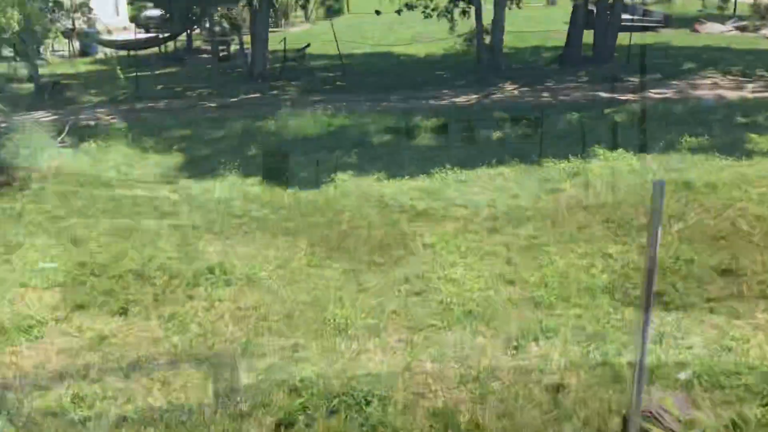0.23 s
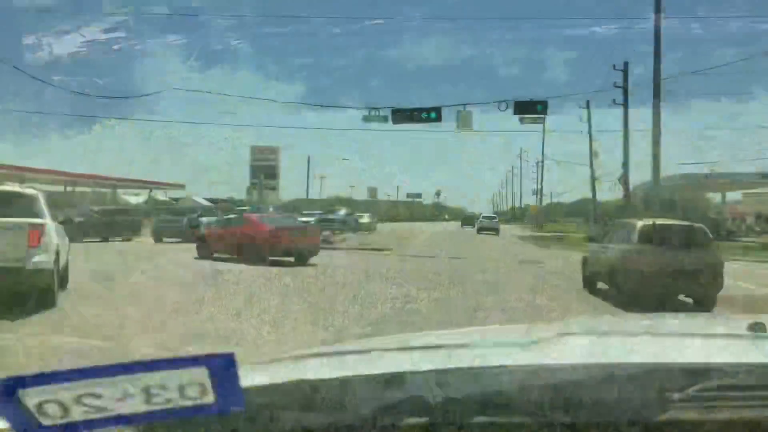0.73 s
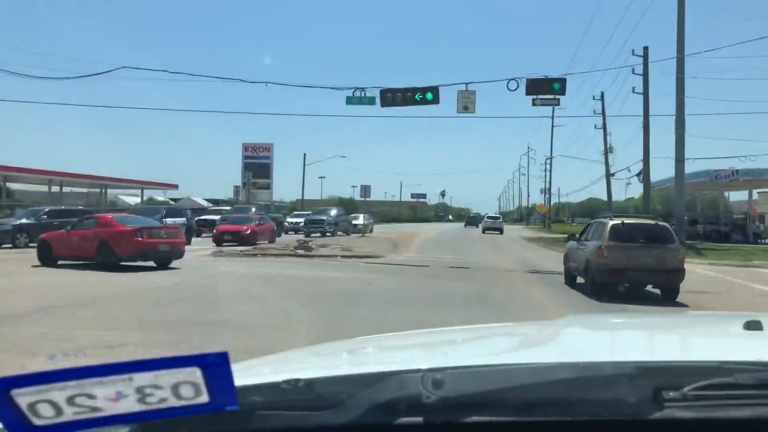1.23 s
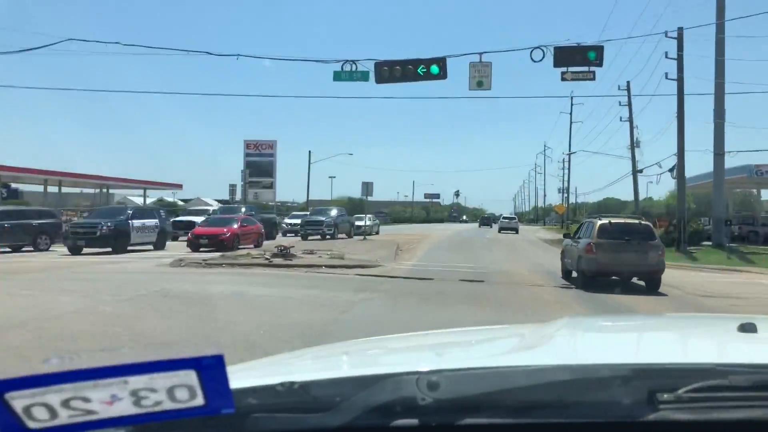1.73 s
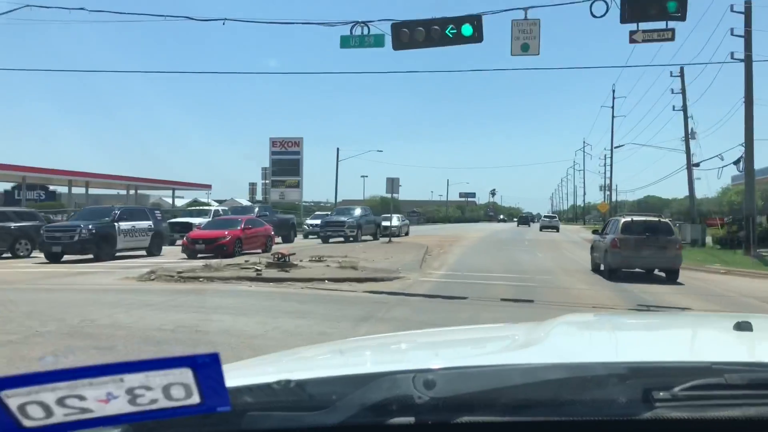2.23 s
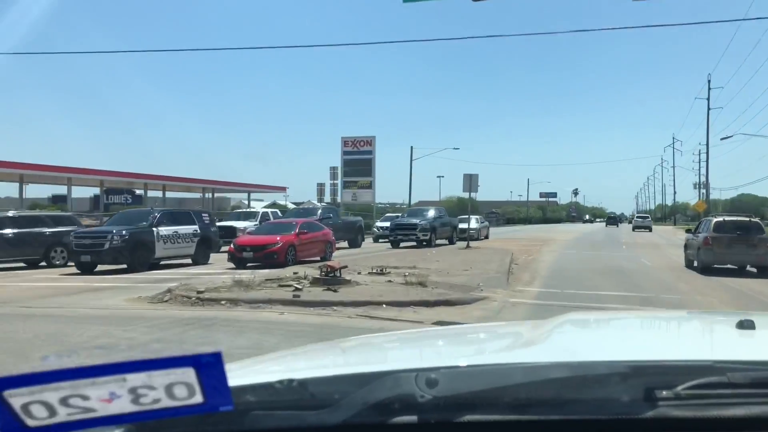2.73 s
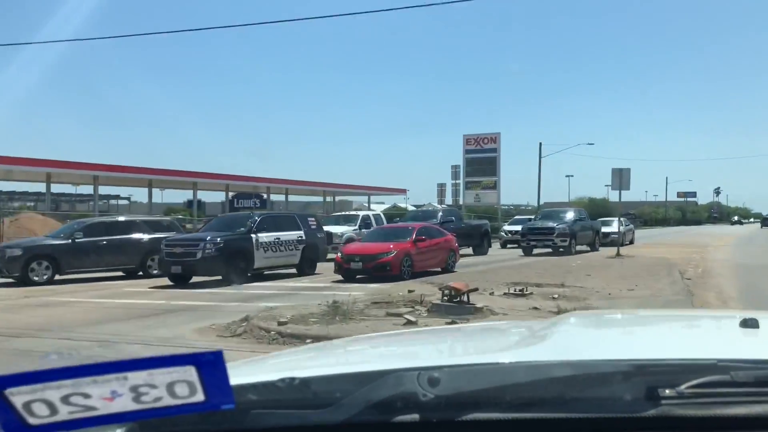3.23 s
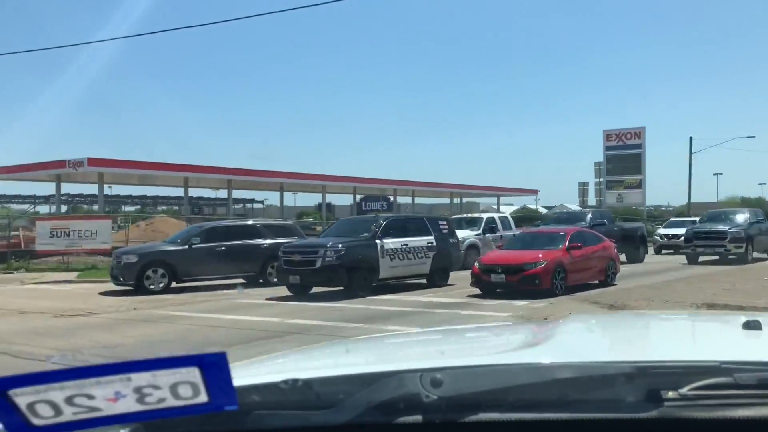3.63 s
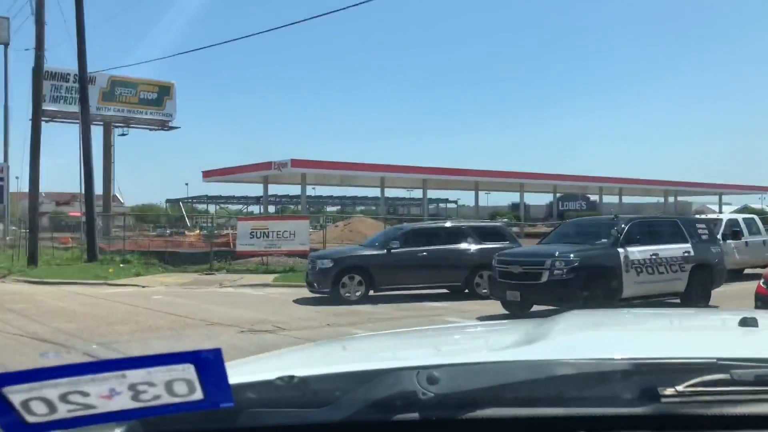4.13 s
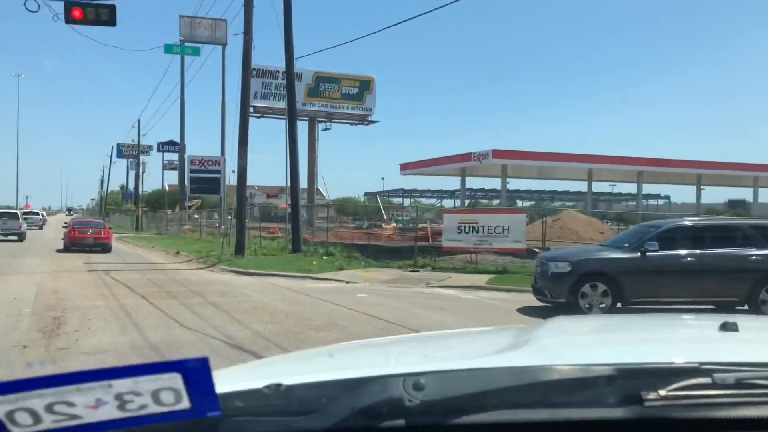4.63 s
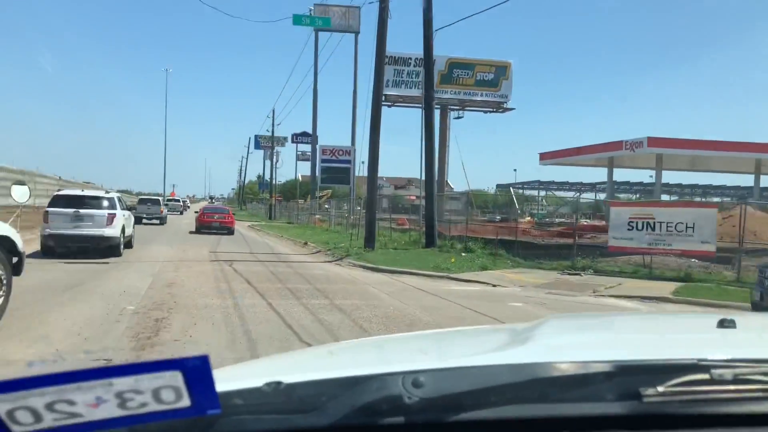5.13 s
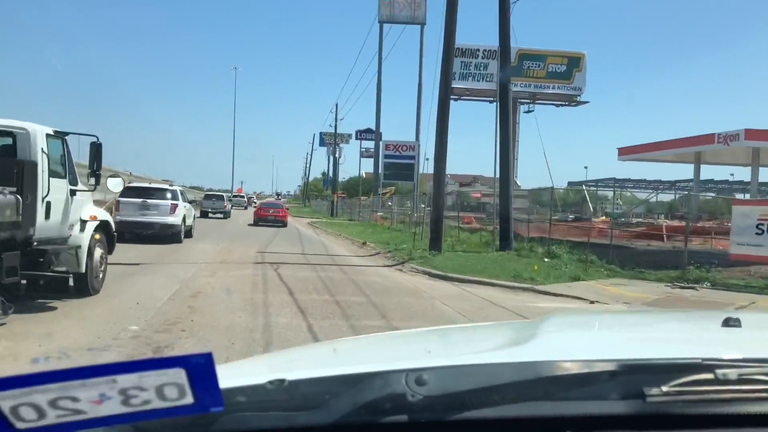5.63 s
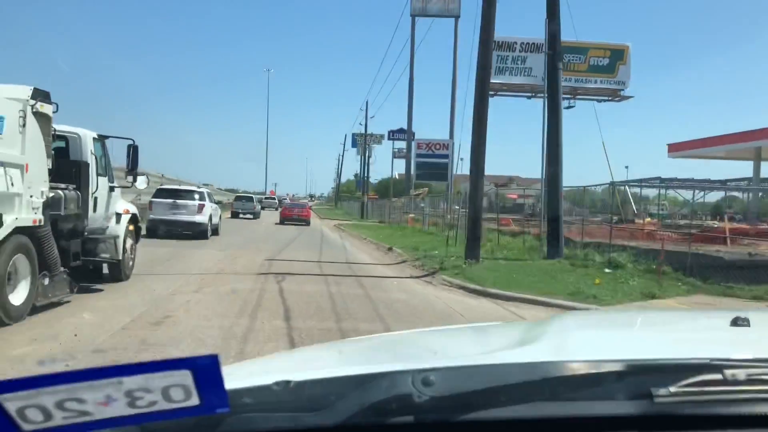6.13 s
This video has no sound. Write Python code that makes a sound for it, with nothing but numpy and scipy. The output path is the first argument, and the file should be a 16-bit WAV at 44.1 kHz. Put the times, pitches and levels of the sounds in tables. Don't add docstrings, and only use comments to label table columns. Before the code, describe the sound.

A faint outdoor garden ambience dissolves into a rumbling diesel pickup cab, indicator tick-tocking steadily, loose keys knocking as it turns and pulls away.

```python
import sys
import numpy as np
from scipy import signal
from scipy.fft import rfft, irfft, next_fast_len
from scipy.io import wavfile
from scipy.ndimage import uniform_filter1d

SR = 44100
rng = np.random.default_rng(int(sys.argv[2]) if len(sys.argv) > 2 else 0)


def transcribe(u):
    v = np.clip(np.atleast_2d(u).T, -1, 1)
    q = np.round(v * 32767).astype(np.int16)
    wavfile.write(sys.argv[1], SR, q)


def undo_db(level):
    steps = np.asarray(level, float) / 20
    return 10 ** steps


N = 281534


def rms_one(x):
    return x / np.sqrt(np.mean(x ** 2) + 1e-20)


def in_time(rows):
    s, *columns = np.transpose(rows)
    return [np.interp(np.arange(N) / SR, s, c) for c in columns]


def drift(rate):
    r = np.exp(-80 * np.pi * rate / SR)
    slow = signal.lfilter([1], [1, -2 * r, r * r], rng.standard_normal(N // 40 + 2002))[2000:]
    return np.interp(np.arange(N) / 40, np.arange(len(slow)), rms_one(slow))


def ring(clicks, hz, t60_s):
    r = undo_db(-60 / (t60_s * SR))
    w = 2 * np.pi * min(hz, .45 * SR) / SR
    return signal.lfilter([0, np.sin(w)], [1, -2 * r * np.cos(w), r * r], clicks + 1e-18)


def noise_bands(colour, splits_hz, modes=()):
    size = next_fast_len(N)
    hz = np.arange(1, size // 2 + 2) * SR / size
    colour_hz, colour_db = np.transpose(colour)
    shape_db = np.interp(np.log(hz), np.log(colour_hz), colour_db, left=-99, right=-99)
    for centre_hz, width_hz, db in modes:
        shape_db = shape_db + db / (1 + (2 * (hz - centre_hz) / width_hz) ** 2)
    noise = rfft(rng.standard_normal(size)) * undo_db(shape_db)
    below = [0 * hz] + [1 / (1 + (hz / split) ** 8) for split in splits_hz] + [1 + 0 * hz]
    return [rms_one(irfft(noise * (b - a), size)[:N]) for a, b in zip(below, below[1:])]


def tone(hz, db, wobble_db, wobbles_per_s=9):
    gain = np.sqrt(2) * undo_db(db + wobble_db * drift(wobbles_per_s))
    return gain * np.sin(2 * np.pi * np.cumsum(hz + np.zeros(N)) / SR)


def hump(s, half_s):
    return np.exp(-((np.arange(N) / SR - s) / half_s) ** 2)


def swell(from_s, to_s):
    along = np.clip((np.arange(N) / SR - from_s) / (to_s - from_s), 0, 1)
    return along, np.abs(np.sin(np.pi * along)) ** 0.53 * (along < 1)


def glide(from_s, to_s, from_hz, to_hz, db, wobble_db, wobbles_per_s=9):
    along, gain = swell(from_s, to_s)
    return gain * tone(from_hz + (to_hz - from_hz) * along, db, wobble_db, wobbles_per_s)


def garden():
    # pitch_hz, level_db_per_hz
    garden_colour = [(15, -51), (25, -24), (80, 8.5), (531, -9.5), (624, -16), (887, -15.5), (2760, -20),
                     (9840, -37), (16000, -47)]
    # pitch_hz, width_hz, level_db
    garden_hums = [(131, 39, 5), (612, 42, 10.5), (1160, 69, 9), (2750, 230, 2.5), (4500, 300, 5.5)]
    insect_hz, insect_width_hz, chirps_per_s = 9700, 1000, 65
    garden_out_s, garden_db, garden_fade_power = 1, -37.5, 1.43
    insects_out_s, insects_db, insects_fade_power = .95, -65.5, .5

    turn = 2 * np.pi * np.cumsum(chirps_per_s * (1 + 0.011 * drift(3))) / SR
    pulses = np.maximum(np.cos(2 * turn) + 0.36 * np.cos(turn) + .6, .3)
    edges_hz = [insect_hz - insect_width_hz / 2, insect_hz + insect_width_hz / 2]
    band = signal.butter(3, edges_hz, "band", fs=SR, output="sos")
    buzz = rms_one(signal.sosfilt(band, pulses * rng.standard_normal(N)))
    air = noise_bands(garden_colour, [], garden_hums)[0]
    left, insects_left = np.clip(1 - np.arange(N) / SR / [[garden_out_s], [insects_out_s]], 0, 1)
    insects = undo_db(insects_db) * insects_left ** insects_fade_power * buzz
    return undo_db(garden_db) * left ** garden_fade_power * air + insects


def whistles():
    # from_s, to_s, from_hz, to_hz, level_db
    brake_squeak = (2.212, 2.285, 12280, 12050, -63.5)
    # pitch_hz, level_db
    screen_whine = (15625, -77)
    squeak = glide(*brake_squeak, wobble_db=3.5, wobbles_per_s=90)
    return squeak + tone(*screen_whine, wobble_db=1.0, wobbles_per_s=3)


def passing_truck():
    # from_s, to_s, from_hz, to_hz, level_db
    truck_orders = [(6.3, 7.5, 177, 200, -34.5), (5.7, 6.3, 230, 258, -32.5), (6.17, 6.37, 372, 378, -34)]
    return sum(glide(*order, wobble_db=2.0) for order in truck_orders)


def relay(times_s, level_db, modes):
    clicks = np.zeros(N)
    for s in times_s:
        for lag_s, bounce_db in [(-.0012, -5.5), (.0003, 3), (.0032, -25)]:
            clicks[round((s + lag_s) * SR)] += undo_db(level_db + bounce_db)
    out = np.zeros(N)
    for hz, db, t60_s in modes:
        out += undo_db(db) * (ring(clicks, hz, t60_s) - ring(clicks, hz, t60_s / 4))
    return out


def indicator():
    # closes_s, opens_s; the last opening is the lever cancelling
    blinks = [(.2714, .5543), (.9503, 1.235), (1.6298, 1.915), (2.3102, 2.593), (2.9891, 3.275),
              (3.6718, 3.9535), (4.3517, 4.6353), (5.0311, 5.211)]
    # pitch_hz, level_db, t60_s
    tick_modes = [(1600, -9, .012), (1950, -10, .012), (2300, 0, .016), (2450, -1, .014), (2600, -10, .04),
                  (3430, -15, .015), (4300, -17, .008), (4900, -12, .012), (5200, -12, .03),
                  (5550, -8, .014), (6000, -10, .016), (7200, -20, .008), (9200, -21, .008),
                  (10300, -23, .008), (13000, -21, .025)]
    # pitch_hz, level_db, t60_s
    tock_modes = [(1600, 1, .022), (1900, -4, .014), (2350, -6, .012), (3400, -7, .016), (4300, -12, .008),
                  (5300, -10, .03), (5500, -4, .014), (5750, -6, .012), (6600, -14, .008), (7600, -9, .014),
                  (9500, -19, .007), (12000, -22, .007)]
    closes_s, opens_s = zip(*blinks)
    return relay(closes_s, -35 + 4.0, tick_modes) + relay(opens_s, -43 + 8.5, tock_modes)


def knocks(events, loudest_db, others_db):
    # pitch_hz, level_db
    key_modes = [(500, -12), (1100, -4), (2000, -2), (3000, 0), (4500, -1), (6500, -1), (9000, -6),
                 (12500, -6), (16500, -7), (20000, -12)]
    ring_cycles, early = 22, 200
    lag = np.arange(4096)
    hz = np.maximum(np.arange(2049) * SR / 4096, 20)
    modes_hz, modes_db = np.transpose(key_modes)
    body_db = np.interp(np.log(hz), np.log(modes_hz), modes_db)
    shape = (len(events), len(lag))
    grit = rng.standard_normal(shape) * (rng.random(shape) < .24)
    pitches_hz = 1200 * 12 ** rng.random((len(events), 12))
    out = np.zeros(N + len(lag))
    for (s, db, tilt_db, ms, loudest_hz), g, own_hz in zip(events, grit, pitches_hz):
        tau = max(ms, .3) * SR / 1000
        cluster = np.roll(rms_one(g * np.sqrt(lag / tau) * np.exp(-lag / tau)) / 200, early)
        tilt = tilt_db * np.log2(np.maximum(hz, 500) / 5000)
        crack = irfft(rfft(cluster) * undo_db(body_db + tilt))
        humps = []
        for f in [loudest_hz, *own_hz]:
            peak_gain = 2 * np.log(1000) * f / (ring_cycles * SR)
            humps.append(ring(crack, f, ring_cycles / f) * peak_gain)
        loudest = undo_db(loudest_db) * np.std(crack) * rms_one(humps[0])
        knock = crack + loudest + undo_db(others_db) * sum(humps[1:])
        at = round(s * SR) - early
        out[at:at + len(lag)] += undo_db(db + 30) * knock
    return out[:N]


def contacts():
    # start_s, level_db, bright_hz
    clacks = [
        (1.553, -22.5, 6710),
        (3.366, -28.5, 8200),
        (3.678, -23.5, 7240),
    ]
    # lag_s, level_db, contact_ms, loudest_hz (0 = bright_hz)
    clack_run = [(0, -1, 2.8, 0), (.0015, -1, 1.2, 3050), (.003, -8, 2.5, 5700), (.0105, -12, 4.8, 0),
                 (.029, -26, 4, 0)]
    # start_s, level_db, contact_ms, loudest_hz
    jangle = [(1.541, -55, 1.2, 9800), (3.845, -53, 3, 900), (4.1125, -40, 6.9, 3420),
              (4.1605, -36.5, .25, 14600), (4.699, -44, 3.5, 7100), (4.703, -31.5, 1.8, 3000),
              (4.7203, -30, 3.2, 4500), (4.726, -22.5, 2.4, 1330), (4.735, -20, 2.7, 4320),
              (4.7375, -19.5, 1.6, 2960), (4.742, -23, 2.5, 1390), (4.748, -33, 2.8, 3300),
              (4.762, -32, 5.7, 3530), (4.773, -40, 5, 5520), (4.785, -38, 1.8, 6000),
              (4.796, -44, 3.4, 9000), (4.81, -39, 3.2, 3700), (4.827, -44, 3, 3730),
              (4.845, -55, 4.9, 4500)]
    # start_s, level_db, contact_ms, loudest_hz
    creaks = [(1.384, -50, 1.75, 11300), (1.43, -48, 9.6, 9000), (1.4677, -53, 1.5, 9900),
              (1.784, -51, 2.5, 4500), (2.08, -54, 1.6, 13000), (2.33, -53, 8.8, 11980),
              (2.77, -57, 9.5, 14000), (2.925, -58, 2.5, 4030), (3.09, -60, 5.8, 14000),
              (3.125, -58, 6.8, 10000), (3.3127, -47.5, 3.5, 6100), (3.57, -53, 14, 8000),
              (3.83, -54, 7.6, 10900), (4.0, -57, 6, 10020), (4.125, -52, 18, 9930), (4.2, -52, 12, 8970),
              (4.225, -53, 19, 12000), (4.27, -52, 26, 12000), (4.32, -50, 16, 10000),
              (5.17, -52, 22, 11000), (5.2638, -47, 2.5, 4000), (5.272, -54, 1.9, 8000),
              (5.41, -55, 7.9, 13050), (5.5425, -58, 1.8, 12000), (5.595, -59, 2.5, 10730),
              (5.92, -59, 3.2, 12000), (5.999, -49, 13, 8000), (6.06, -49, 7.6, 9000),
              (6.115, -54, 2.5, 5300)]
    clack_tilt_db, creak_gain_db = 2, 1.5
    tilt_db_per_octave, flat_hz = 1.2, 4000

    runs = [(s + lag_s, db + down_db, clack_tilt_db, ms, hz or bright_hz)
            for s, db, bright_hz in clacks for lag_s, down_db, ms, hz in clack_run]
    loose = jangle + [(s, db + creak_gain_db, ms, hz) for s, db, ms, hz in creaks]
    loose = [(s, db, tilt_db_per_octave * np.log2(hz / flat_hz), ms, hz) for s, db, ms, hz in loose]
    return knocks(runs, loudest_db=-0.5, others_db=-6) + knocks(loose, loudest_db=-3, others_db=-8)


def cab(x):
    t60_s, tail_db = .068, -7
    t = np.arange(round(.15 * SR)) / SR
    tail = rng.standard_normal(len(t)) * undo_db(-60 * t / t60_s) * np.clip(t / 0.0053, 0, 1)
    tail = signal.lfilter([1], [1, -.3], tail)
    return x + undo_db(tail_db) * signal.fftconvolve(x, tail / np.sqrt(np.sum(tail ** 2)))[:N]


def driveline():
    # time_s, pitch_hz
    shaft = [(.2, 160.1), (1.0, 152.7), (1.55, 147.7), (2.0, 141), (2.3, 134), (2.62, 128)]
    # multiple, from_s, to_s, level_db
    shaft_orders = [(1.0, .05, 2.0, -29.5), (1.0, 1.95, 2.52, -28), (1.395, .3, 1.6, -32),
                    (1.2, 2.15, 2.64, -28)]
    # from_s, to_s, from_hz, to_hz, level_db
    gear_whine = [
        (5.254, 5.695, 406, 424, -38),
        (5.742, 6.053, 421, 434.4, -37.5),
    ]
    shaft_hz, = in_time(shaft)
    orders = sum(swell(a, b)[1] * tone(k * shaft_hz, db, wobble_db=1.1) for k, a, b, db in shaft_orders)
    return orders + sum(glide(*row, wobble_db=1.0) for row in gear_whine)


def engine(coarse_db, load_db, heave_db):
    # pitch_hz, level_db_per_hz
    hiss_colour = [(530, -33), (900, -9.5), (1310, -0.5), (1440, -10), (1600, -6.5), (1880, -7), (2250, -9),
                   (2540, -11.5), (3110, -11), (4920, -17), (5750, -18), (9420, -26.5), (16000, -33)]
    idle_hz, hunt_hz, throb_db, throb_coarse = 57.4, .8, -38, 0.98
    clatter_db, clatter_load = -51.5, 0.55
    air_db, air_load, air_heave = -68.5, 0.46, .08
    lean_s, lean_half_s, lean_db = 4.03, 0.71, 2.5

    clatter, air = noise_bands(hiss_colour, [6500])
    firing_hz = idle_hz + hunt_hz * drift(1.66)
    firing = np.cos(2 * np.pi * np.cumsum(firing_hz) / SR)
    stir_db = .5 * drift(7)
    clatter = undo_db(clatter_db + clatter_load * load_db + 0.54 * firing + stir_db) * clatter
    leak_db = lean_db * hump(lean_s, lean_half_s)
    air = undo_db(air_db + air_load * load_db + air_heave * heave_db + leak_db + stir_db) * air
    throb = tone(firing_hz, throb_db + throb_coarse * coarse_db + heave_db, wobble_db=-2.0)
    return throb + clatter + air


def heave():
    # centre_s, level_db
    swells = [(.57, 5), (.96, 6.5), (1.37, 9.5), (1.62, 7.5), (1.96, 10.5), (2.4, 9.5), (2.6, 11.5),
              (3.0, 1), (3.67, 13.5), (4.0, 10), (4.25, 8), (4.65, 12.5), (5.3, 8), (6.04, 6.5), (6.36, 4)]
    return np.max([db * hump(s, half_s=0.099) for s, db in swells], axis=0)


def road(coarse_db, load_db, heave_db):
    # pitch_hz, level_db_per_hz
    road_colour = [(12, -65), (20, -35.5), (35, 0.5), (48, -1), (92, -1), (181, -4), (217, -3.5), (291, -6),
                   (452, -16.5), (542, -20), (640, -23.5), (874, -25), (1260, -33), (1490, -41.5),
                   (1600, -37), (2080, -54.5), (3520, -120)]
    # pitch_hz, width_hz, level_db
    cab_air_modes = [(57.7, 30, 7), (83.5, 48, 8), (100, 46, 4.5), (211.4, 31, 7), (254.4, 36, 5),
                     (534, 78, 4), (878, 25, 1.5)]
    # level_db, coarse_share, load_share, heave_share
    rumble = [
        (-30.5, 0.19, 0.1, 0.42),
        (-27.5, 0.92, 0.1, 0.041),
        (-36.5, 0.12, 0.88, 0.079),
    ]
    out = np.zeros(N)
    bands = noise_bands(road_colour, [120, 320], cab_air_modes)
    for (db, coarse_share, load_share, heave_share), band in zip(rumble, bands):
        out += undo_db(db + coarse_share * coarse_db + load_share * load_db + heave_share * heave_db) * band
    return out


def scene():
    # time_s, level_db
    coarse = [(0, 4), (1.2, 5.5), (1.9, 3.5), (2.24, 6), (2.55, 2), (2.72, 0), (3.4, -1.5), (3.7, -2.5),
              (4.75, -0.5), (5.0, -4), (5.2, 2), (5.6, 0.5), (5.9, 1.5), (6.38, 1)]
    # time_s, level_db
    load = [(0, 0.5), (2.9, 0), (3.7, 0), (4.9, 0), (5.35, 0.5), (5.7, 3), (6.1, 3), (6.38, 3)]
    cab_in_s, cab_full_s = 0.063, 1.11
    controls = in_time(coarse)[0], in_time(load)[0], heave()
    clicks = cab(indicator() + contacts())
    inside = road(*controls) + engine(*controls) + driveline() + passing_truck() + whistles() + clicks
    fade_in = np.clip((np.arange(N) / SR - cab_in_s) / (cab_full_s - cab_in_s), 0, 1)
    return (fade_in * inside + garden())[None]


def band_limit(x):
    return signal.sosfilt(signal.butter(12, 16650, fs=SR, output="sos"), x)


def record(dry):
    hiss_db, bass_cut_hz, top_cut_hz = -74.5, 24, 15760
    wet = dry + undo_db(hiss_db) * rng.standard_normal(N)
    wet = signal.sosfilt(signal.butter(2, bass_cut_hz, "high", fs=SR, output="sos"), wet)
    level_db = 10 * np.log10(uniform_filter1d(wet ** 2, size=1500) + 1e-9)
    wet = wet * undo_db(-.3 * np.maximum(level_db + 22, 0))
    wet = signal.sosfilt(signal.ellip(8, .5, 24, top_cut_hz, fs=SR, output="sos"), wet)
    wet = wet * np.clip((N - np.arange(N)) / 200, 0, 1)
    return band_limit(wet)


dry = scene()
out = record(dry)
transcribe(out)
```